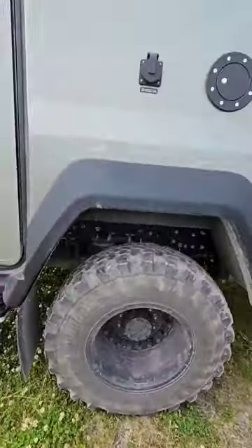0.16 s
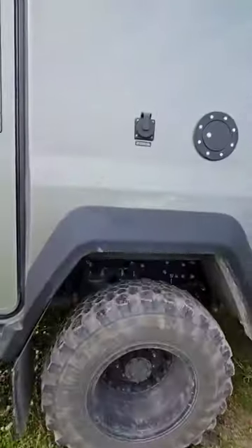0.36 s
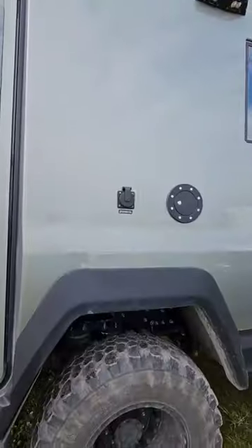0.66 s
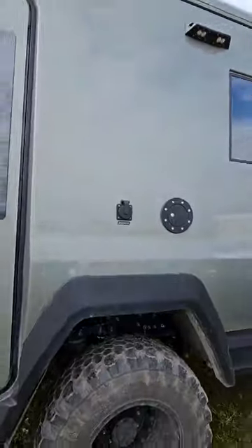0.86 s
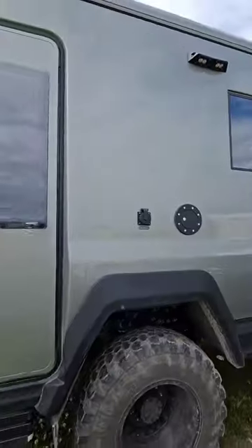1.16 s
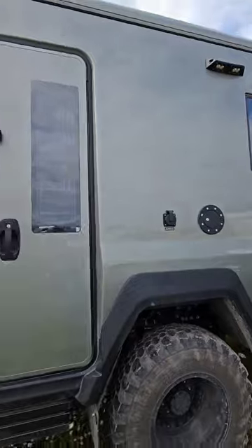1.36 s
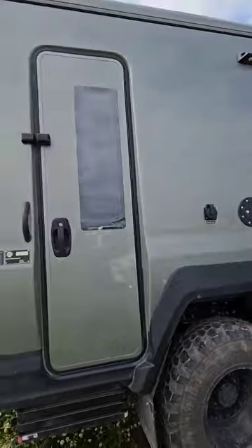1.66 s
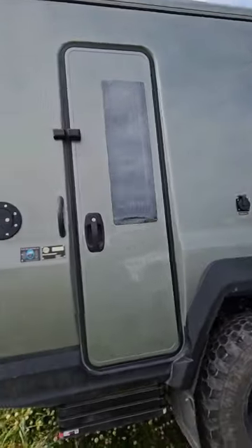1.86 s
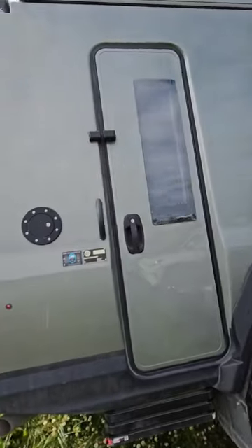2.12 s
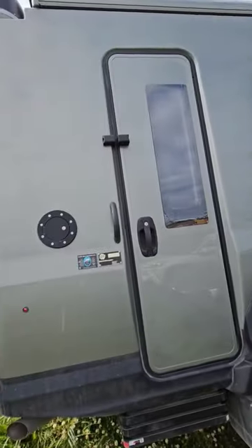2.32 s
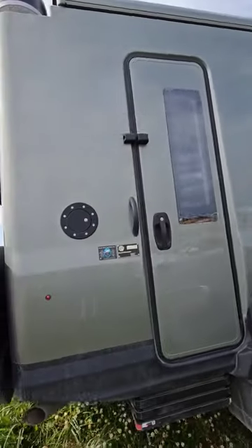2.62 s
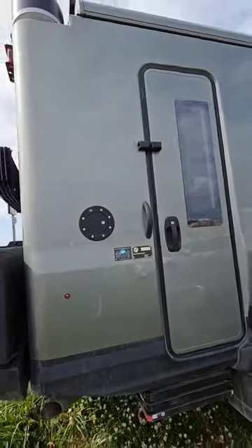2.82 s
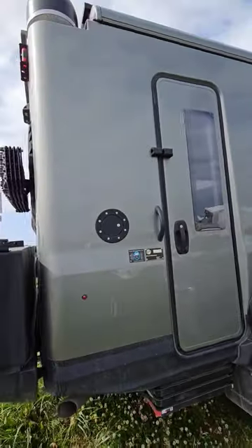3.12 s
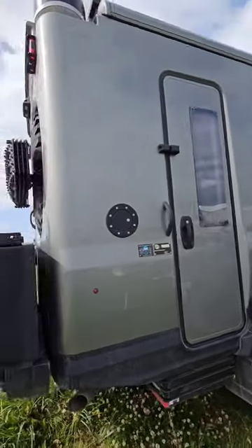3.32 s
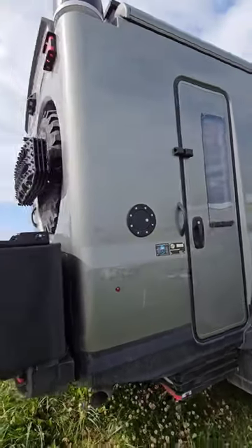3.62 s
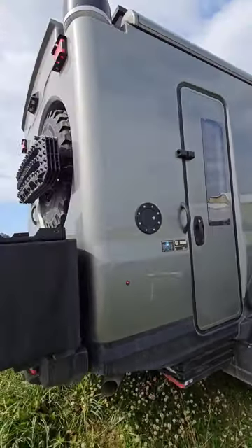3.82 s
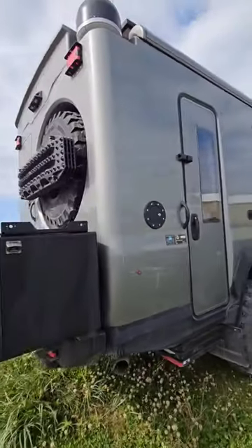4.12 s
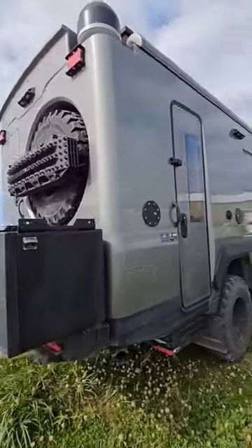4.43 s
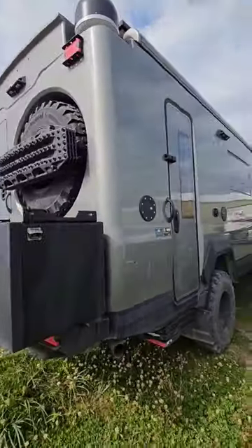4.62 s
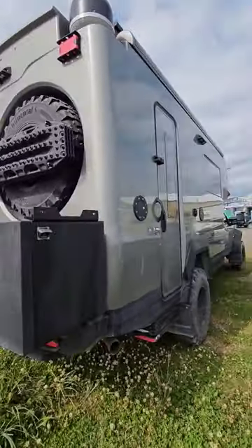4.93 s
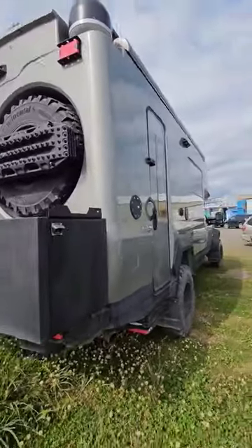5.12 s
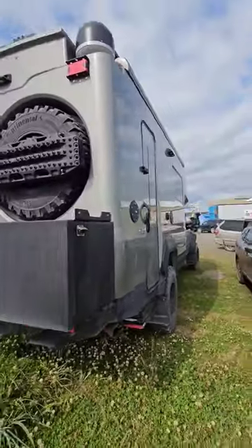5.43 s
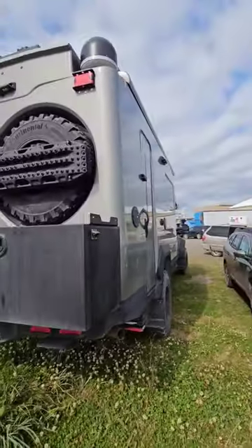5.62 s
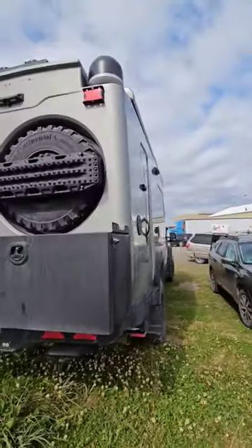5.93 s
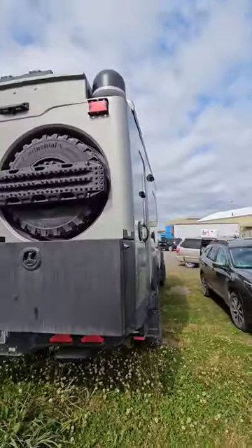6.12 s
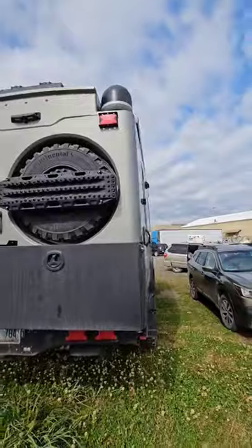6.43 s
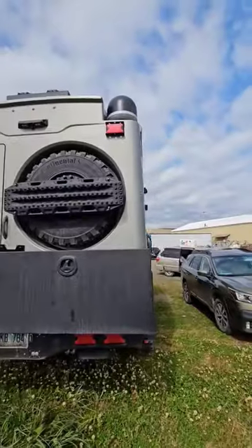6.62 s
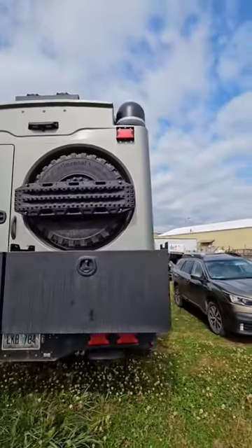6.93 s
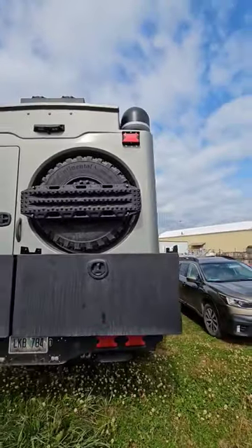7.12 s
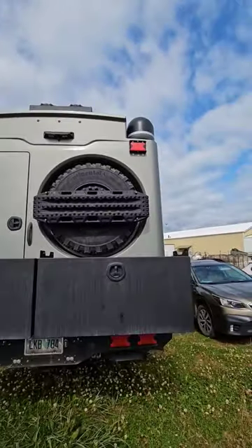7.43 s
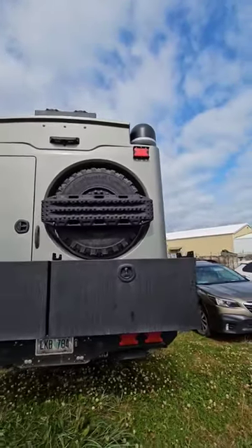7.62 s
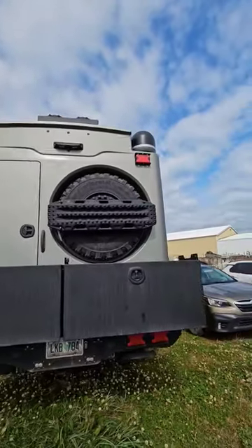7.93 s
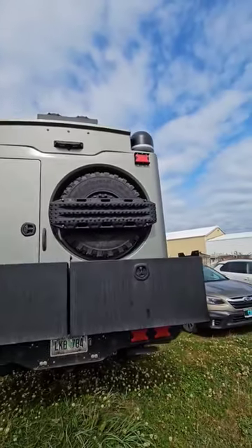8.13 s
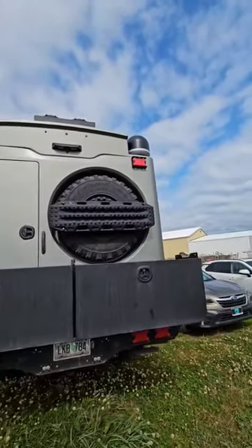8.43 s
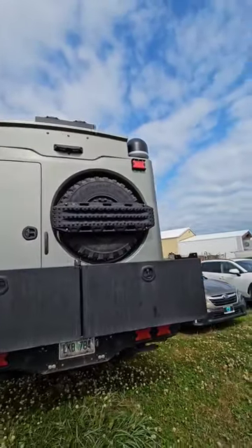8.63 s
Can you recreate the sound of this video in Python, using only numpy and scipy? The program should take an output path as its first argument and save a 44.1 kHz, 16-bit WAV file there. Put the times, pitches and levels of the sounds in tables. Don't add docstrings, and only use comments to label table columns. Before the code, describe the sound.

A big diesel truck idles with a deep lumpy boom while someone walks around it through swishing grass, stalks snapping and heels thudding on turf.

```python
import sys
import numpy as np
from scipy import signal
from scipy.io import wavfile
from scipy.ndimage import map_coordinates

SR = 44100
rng = np.random.default_rng(int(sys.argv[2]) if len(sys.argv) > 2 else 0)


def gain_from_db(level_db):
    decades = np.asarray(level_db, float) / 20
    return 10 ** decades


def store_wav(level_fs):
    pcm = np.round(np.clip(np.atleast_2d(level_fs), -1, 1) * 32767)
    wavfile.write(sys.argv[1], SR, pcm.T.astype(np.int16))


N = 386360


def exhaust():
    # t/s, speed/rpm
    speed = [(0.0, 685.35), (0.37, 725.11), (0.71, 712.91), (1.5, 732.7), (1.94, 732.7), (2.36, 704.45),
             (2.82, 723.09), (2.96, 709.88), (3.56, 708.58), (3.95, 756.0), (5.12, 710.78), (5.32, 722.26),
             (6.15, 731.57), (6.29, 716.23), (7.18, 731.5), (7.68, 703.22), (8.05, 725.91), (8.76, 720.17)]
    # t/s, boom/dB, silencer/dB, how squarely its outlet faces the listener/dB
    walk = [(0.05, -15, -34.5, 6.5), (1.02, -14, -32, -4.5), (1.95, -14, -34.5, -10),
            (2.3, -15, -30.5, -9.5), (3.05, -16, -31.5, -11), (3.5, -15, -28.5, -5), (4.1, -18, -26, -3),
            (4.7, -14.2, -27.5, -1), (5.7, -14, -27.5, 1), (6.72, -15, -31, 0.5), (6.92, -15, -29, 0),
            (7.3, -20, -33, 0), (7.55, -22, -46, 7.5), (7.75, -23.5, -40, 11.5), (8.05, -24.5, -38, 0),
            (8.5, -23, -40.5, 4.5), (8.6, -23, -30.5, 0.0), (8.76, -30.5, -37, 0)]
    # f/Hz, density/dB per Hz
    rumble_colour = [(18, -13.5), (40, -5), (55, 0), (90, -2.5), (200, -8.5), (260, -25.5), (330, -27.5)]
    start_cycle = 0.0331
    cycle = start_cycle + np.cumsum(in_time(speed)[0]) / 120 / SR
    boom_db, low_db, facing_db = in_time(walk)

    uneven = np.minimum(0.6 + 0.42 * (boom_db.max() - boom_db), 2.7)
    low, high, shell, arch = silencer(cycle)
    rings = gain_from_db(low_db + 1.4) * low + gain_from_db(low_db + facing_db - 2.3) * high

    body_db = 0.5 * (low_db - low_db.mean()) + 1.0 * drift(3.3)
    shell_lift_db, arch_lift_db = openings()
    body = gain_from_db(-54 + shell_lift_db) * shell + gain_from_db(-56.5 + arch_lift_db) * arch
    rings = rings + gain_from_db(body_db) * body

    rumble = gain_from_db(low_db - 4.5) * banded_noise(rumble_colour, patchy_db=2.5, rate=8, count=8)
    pipe = gain_from_db(boom_db) * boom(cycle, uneven) + late_left(rings, 14)
    lean_db = 0.72 - 0.075 * np.arange(N) / SR
    return pan(pipe, lean_db) + rumble


def boom(cycle, uneven):
    # lateness/turns, strength/dB
    swings = [(-0.013, -0.6), (0.02, 0.3), (0.047, 0.4), (-0.0, 0.1), (-0.062, 0.2), (-0.035, 0.8),
              (-0.008, 0.7), (-0.053, -0.8), (-0.041, -1.9), (0.026, 0.4), (0.074, 0.3), (0.035, -0.2)]
    place = [12 * cycle % 12]
    late, strength_db = [map_coordinates(c, place, order=3, mode="grid-wrap") for c in np.transpose(swings)]
    mood = np.clip(1 + 0.3 * drift(2.5), 0.2, 3)
    flutter_db = 0.35 * drift(4) + 0.35 * drift(14)
    level = gain_from_db(uneven * mood * strength_db + uneven * flutter_db)
    wobble = 0.006 * drift(9)
    ahead = np.array([[-0.012], [0.012]])
    return np.sqrt(2) * level * np.cos(2 * np.pi * (12 * cycle - late + wobble + ahead))


def silencer(cycle):
    # place in cycle/0-1, f/Hz, width/Hz, level/dB, chamber (0 low, 1 high, 2 shell, 3 wheel arch)
    puff_table = [(.1034, 144, 32, -10, 0), (.4288, 128, 32, -11.4, 0), (.4953, 165, 18, -12.4, 0),
                  (.6301, 105, 14, -15.5, 0), (.7296, 142, 23, -11.4, 0), (.26, 192, 26, -17.5, 1),
                  (.4612, 202, 10, -21.8, 1), (.6051, 186, 12, -16.5, 1), (.8253, 196, 30, -15.5, 1),
                  (.59, 245, 18, -31, 2), (.78, 330, 34, -28, 3), (.12, 335, 40, -30, 3),
                  (.83, 245, 30, -31, 2)]
    chambers = np.zeros((4, N))
    for place, hz, width_hz, db, chamber in puff_table:
        at = np.flatnonzero(np.diff(np.floor(cycle - place)))
        luck = rng.standard_normal((60, 2))[:len(at)] * [1, 1 + chamber / 4]
        jitter = (0.0002 * SR * luck[:, 0]).astype(int)
        puffs = np.full(N, 1e-18)
        puffs[np.clip(at + jitter, 0, N - 1)] = gain_from_db(db + 0.9 * luck[:, 1])
        r = np.exp(-np.pi * width_hz / SR)
        w = 2 * np.pi * hz / SR
        twice = [[1 - r, 0, r - 1, 1, -2 * r * np.cos(w), r * r]] * 2
        chambers[int(round(chamber))] += signal.sosfilt(twice, puffs) / width_hz
    return [rms_one(c) for c in chambers]


def openings():
    # t/s, width/s, lift of shell/dB, lift of wheel arch/dB
    gaps = [
        (.6, 0.55, 5, 12),
        (1.6, 0.7, 8.5, -2.5),
        (2.9, 0.62, 9.5, 3),
        (4.099, 0.17, -3.5, 5.5),
        (8.1, 0.22, 6.5, -2.5),
    ]
    t = np.arange(N) / SR
    shell_db, arch_db = np.zeros((2, N))
    for s, width, shell_lift, arch_lift in gaps:
        near = np.exp(-((t - s) / width) ** 2)
        shell_db += shell_lift * near
        arch_db += arch_lift * near
    return shell_db, arch_db


def roar():
    # t/s, level/dB
    level = [(0.05, -50), (1.1, -49.5), (1.3, -46), (1.85, -46), (2.15, -49), (2.7, -46), (2.84, -43.5),
             (3.25, -47), (3.7, -46), (4.03, -42), (4.4, -44), (4.6, -41), (5.27, -48), (5.75, -43),
             (6.07, -43), (6.63, -46.5), (7.2, -47.5), (8.76, -50.5)]
    # f/Hz, density/dB per Hz
    colour = [(150, -36.5), (260, -4.5), (297, -7), (416, -13.5), (516, -9), (664, -16), (855, -14),
              (1150, -16.5), (1370, -15), (1870, -18), (2490, -40.5), (3210, -27.5), (4600, -50),
              (5980, -73.5), (10100, -120)]
    shift_oct = 0.03 * np.arange(N) / SR + 0.036 * drift(4.3)

    def hump(hz):
        return 3.4 * np.exp(-((np.log2(hz / 910) - shift_oct) / 0.58) ** 2)

    noise = banded_noise(colour, patchy_db=1.5, rate=7, count=16, shape=hump)
    return gain_from_db(in_time(level)[0] + 2.0) * late_left(noise, 3.0)


def swish():
    # f/Hz, density/dB per Hz
    colour = [(1350, -31.5), (2300, -4.5), (2660, -0.5), (3640, -3), (4000, -9.5), (4820, -1), (6810, -9.5),
              (7560, 0), (10600, -10), (11800, -3.5), (12700, -5.5), (14800, -4.5), (15700, -7)]
    ticks_per_s, tick_ms, tick_db, far_hiss_db = 150, 1.3, -4, -70
    flicks = (rng.random(N) < ticks_per_s / SR) * rng.exponential(1, N) + 1e-18
    ticks = 1 + gain_from_db(tick_db) * signal.lfilter([1], [1, -np.exp(-1000 / tick_ms / SR)], flicks)
    rough_db = 0.48 * drift(60) + 1.2 * drift(21) + 0.76 * drift(7.1)
    touches = strides() * ticks * gain_from_db(-2.0 + rough_db)
    return np.hypot(touches, gain_from_db(far_hiss_db)) * banded_noise(colour, patchy_db=0.9, rate=11, count=11)


def strides():
    # t/s, level/dB
    rustle = [(0, -57), (1.6, -52), (2.2, -60), (3.0, -56), (3.6, -61), (4.1, -57), (5.1, -59), (6.5, -63),
              (7.2, -73.5)]
    # loudest moment t/s, level/dB, length/s
    tall_grass = [(0.02, -54, 0.069), (0.253, -53.5, 0.23), (1.254, -61, .06), (1.371, -49, .07),
                  (1.948, -53.5, 0.11), (2.33, -53.5, 0.16), (2.69, -56, 0.075), (2.818, -49, 0.08),
                  (2.923, -58, 0.067), (3.11, -48.5, 0.14), (3.386, -55, 0.17), (4.02, -56.5, 0.23),
                  (4.5, -46.5, 0.18), (5.28, -61, .12)]
    # loudest moment t/s, level/dB, length/s
    short_turf = [(5.718, -54, 0.047), (6.225, -57, .045), (6.855, -50.5, 0.11), (7.393, -46, 0.061),
                  (7.445, -55, 0.058), (7.59, -63.5, 0.098), (8.025, -49.5, 0.094), (8.16, -65, 0.091),
                  (8.31, -75, .03), (8.623, -53, 0.066), (8.71, -58, .02)]
    edge_db = 11
    t = np.arange(N) / SR
    power = gain_from_db(in_time(rustle)[0]) ** 2
    for rows, rise in ((tall_grass, 0.51), (short_turf, 0.086)):
        for s, db, length in rows:
            near = slice(max(0, round((s - 2 * length) * SR)), round((s + 2 * length) * SR))
            away = (t[near] - s) / length / np.where(t[near] < s, rise, 1 - rise)
            power[near] += gain_from_db(db - edge_db * away ** 2) ** 2
    return np.sqrt(power)


def crunch():
    # t/s, crackle/dB, knock/dB, left-right/dB
    snaps = [(0.271, -35.5, -46, -0.5), (0.3603, -37, -50, 1), (0.8654, -38, -47, 0.0),
             (1.3498, -34, -49, -7), (1.3892, -31.5, -48, 1.5), (1.5204, -36, -43, -5),
             (2.8115, -44, -30.5, -8), (3.445, -41, -43, -0.5), (3.8778, -44.5, -28, -7),
             (3.9006, -46, -21.5, -9.5), (4.0213, -44, -33, -2), (4.642, -46, -35, 4),
             (7.627, -43, -55, -6), (5.716, -48.5, -41, -4), (5.7289, -41.5, -42, 4),
             (6.2315, -36.5, -30, -13), (6.8638, -38, -39.5, -9.5), (6.8915, -31.5, -36, -7.5),
             (7.3985, -32, -30.5, -12), (7.4445, -28.5, -35, -7), (7.6156, -45, -33, -6),
             (8.0202, -42, -45.5, -7), (8.043, -43, -41, -2), (8.0645, -33, -39, -8.5),
             (8.214, -39, -31, -5), (8.31, -41, -33.5, -5.0), (8.623, -35.5, -34, -13),
             (8.6527, -38, -40, -12), (8.6877, -42, -46, -8), (8.7101, -44, -50, -15)]
    knock_hz, knock_decay_ms, snap_decay_ms = 1840, 0.51, 2.53
    t = np.arange(round(0.051 * SR)) / SR
    dull, middle, sharp = np.zeros((3, 2, N + len(t)))
    shape = np.minimum(t / 0.001, 1) * np.exp(-1000 * t / snap_decay_ms)
    for s, db, knock_db, pan_db in snaps:
        at = round(s * SR)
        here = slice(at, at + len(t))
        grit = rng.standard_normal((3, len(t)))
        lean = gain_from_db(np.array([[pan_db], [-pan_db]]) / 2)
        hz = knock_hz * gain_from_db(0.27 * grit[0, 0])
        knock = np.sin(2 * np.pi * hz * t) * np.exp(-1000 * t / knock_decay_ms)
        dull[:, here] += gain_from_db(knock_db) * lean * (knock + 0.28 * shape * grit[0])
        middle[:, here] += gain_from_db(db) * lean * shape * (1.06 * grit[0] + 0.25 * grit[1:])
        sharp_db = db - 16 - 1.71 * pan_db
        sharp[:, here] += gain_from_db(sharp_db) * lean * shape * (0.44 * grit[0] + 0.93 * grit[1:])
    out = gain_from_db(4.0) * band(dull, 900, 3000)
    out += gain_from_db(-2.5) * band(middle, 2200, 6300)
    out += band(sharp, 10000, 15000)
    return out[:, :N]


def thuds():
    # t/s, level/dB, f/Hz
    heels = [
        (2.819, -27.5, 260),
        (6.231, -24.5, 300),
        (6.88, -13, 130),
        (7.39, -24.5, 300),
        (7.438, -31, 300),
        (8.059, -28, 258),
        (8.556, -26, 327),
        (8.617, -24, 383),
    ]
    out = np.zeros(N)
    t = np.arange(round(0.07 * SR)) / SR
    for s, db, hz in heels:
        puff = rms_one(band(rng.standard_normal(len(t)), 0.5 * hz, 1.05 * hz))
        swell = t / 0.026 * np.exp(1 - t / 0.0091)
        out[round(s * SR):][:len(t)] += gain_from_db(db) * puff * swell
    return out


def squeaks():
    # t/s, length/s, from f/Hz, to f/Hz, level/dB
    slips = [
        (.3, 0.14, 1100, 1360, -67),
        (0.527, 0.12, 2090, 1910, -55),
        (0.726, 0.13, 1083, 1175, -51),
        (1.3, 0.067, 1325, 1260, -46),
        (2.236, 0.16, 1080, 1100, -52),
    ]
    out = np.zeros(N)
    for s, length, from_hz, to_hz, db in slips:
        n = round(length * SR)
        turns = np.cumsum(np.linspace(from_hz, to_hz, n)) / SR
        out[round(s * SR):][:n] += gain_from_db(db) * np.hanning(n) * np.sin(2 * np.pi * turns)
    return out * gain_from_db(np.array([[-3], [3]]))


def banded_noise(spectrum, patchy_db, rate, count, shape=lambda hz: 0):
    # f/Hz, likeness/0-1
    likeness = [(60, 1), (150, 1), (380, 0.61), (950, 0.57), (2380, 0.26), (5980, 0), (15000, 0.022)]
    # f/Hz, left-right/dB
    lean = [(60, 3.5), (130, -1), (290, -2), (640, 1), (1410, -5.5), (3100, 0), (6820, 3), (15000, -7)]
    out = 0
    edges = np.geomspace(spectrum[0][0], spectrum[-1][0], count + 1)
    white = rng.standard_normal((2, 2, N))
    for k, (low, high) in enumerate(zip(edges, edges[1:])):
        mid, side = band(white[k % 2], low, high)
        hz = np.sqrt(low * high)
        alike = np.clip(1.28 * at_hz(likeness, hz) - 0.02, 0, 1)
        gain = gain_from_db(at_hz(spectrum, hz) + shape(hz) + patchy_db * drift(rate))
        pair = np.sqrt(1 + alike) * mid + np.sqrt(1 - alike) * side * [[1], [-1]]
        out = out + gain * pan(pair, np.array([at_hz(lean, hz)]))
    return rms_one(out)


def late_left(x, samples):
    left, right = np.broadcast_to(x, (2, N))
    return np.array([np.interp(np.arange(N) - samples, np.arange(N), left), right])


def pan(x, db):
    return x * gain_from_db(np.array([db / 2, -db / 2]))


def drift(rate):
    r = np.exp(-80 * np.pi * rate / SR)
    slow = signal.lfilter([1], [1, -2 * r, r * r], rng.standard_normal(N // 40 + 2002))[2000:]
    return np.interp(np.arange(N) / 40, np.arange(len(slow)), rms_one(slow))


def in_time(rows):
    s, *columns = np.transpose(rows)
    return [np.interp(np.arange(N) / SR, s, c) for c in columns]


def at_hz(points, hz):
    point_hz, value = np.transpose(points)
    return np.interp(np.log(hz), np.log(point_hz), value)


def band(x, low_hz, high_hz):
    return signal.sosfilt(signal.butter(2, [low_hz, high_hz], "band", fs=SR, output="sos"), x)


def bell(x, hz, width_hz, db):
    return x + (gain_from_db(db) - 1) * signal.lfilter(*signal.iirpeak(hz, hz / width_hz, fs=SR), x)


def rms_one(x):
    return x / np.sqrt(np.mean(x ** 2) + 1e-20)


def scene():
    return exhaust() + roar() + swish() + crunch() + thuds() + squeaks()


def low_pass(x):
    return signal.sosfilt(signal.butter(12, 16400, fs=SR, output="sos"), x)


def record(dry):
    port = bell(dry, 11730, width_hz=900, db=3.5)
    port = bell(port, 10500, width_hz=900, db=-3.5)
    mix = signal.sosfilt(signal.cheby2(14, 60, 16100, fs=SR, output="sos"), port)
    return low_pass(mix)


dry = scene()
out = record(dry)
store_wav(out)
```